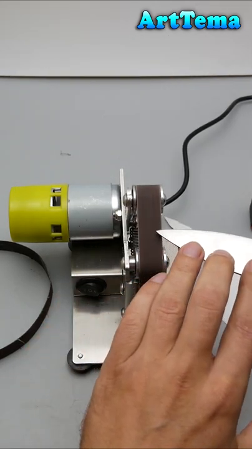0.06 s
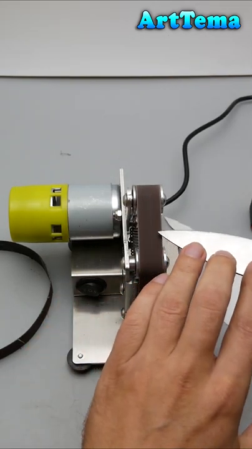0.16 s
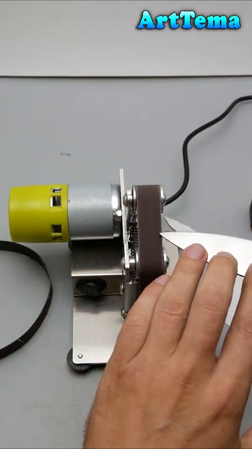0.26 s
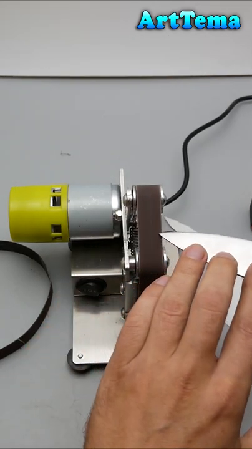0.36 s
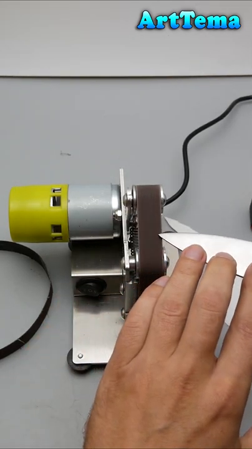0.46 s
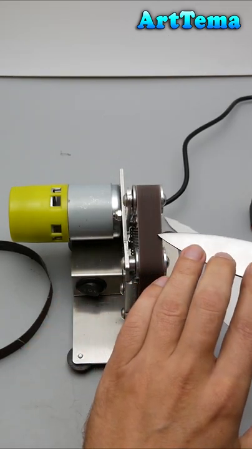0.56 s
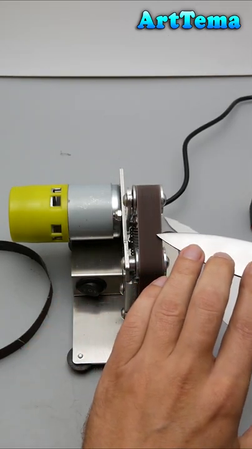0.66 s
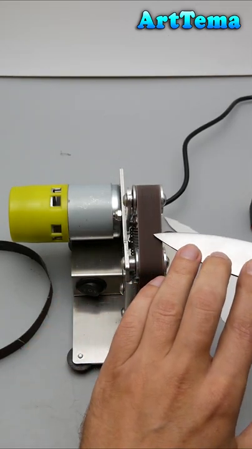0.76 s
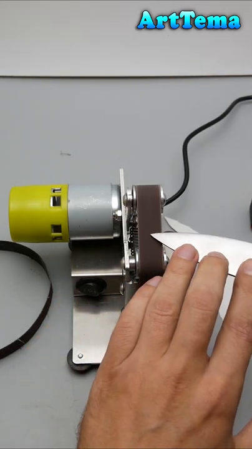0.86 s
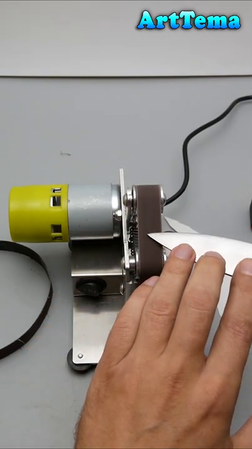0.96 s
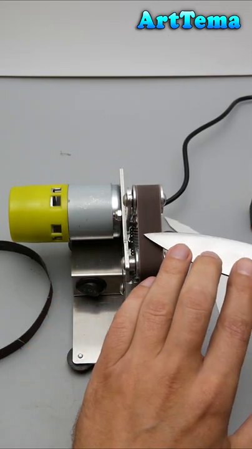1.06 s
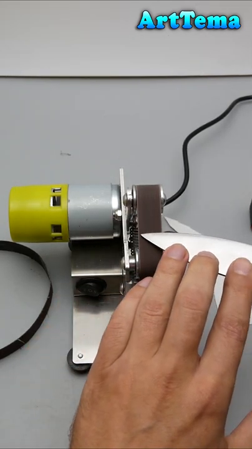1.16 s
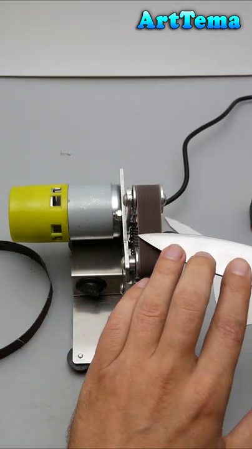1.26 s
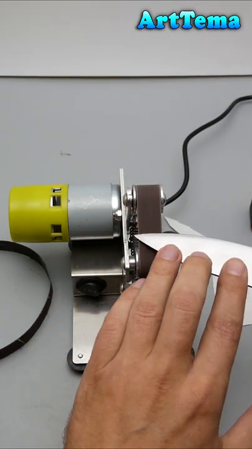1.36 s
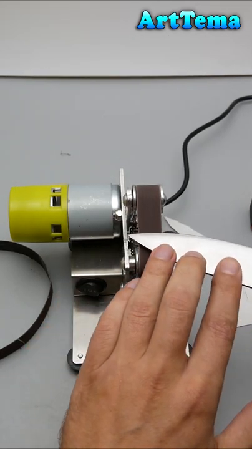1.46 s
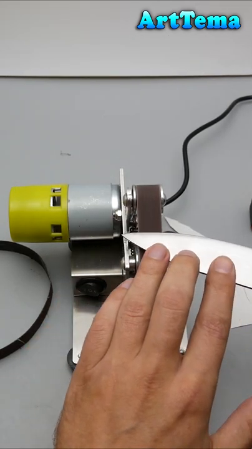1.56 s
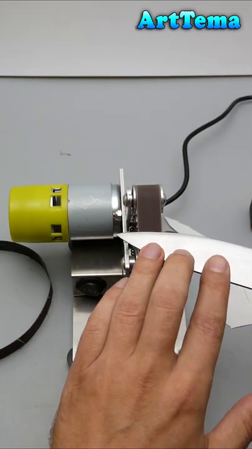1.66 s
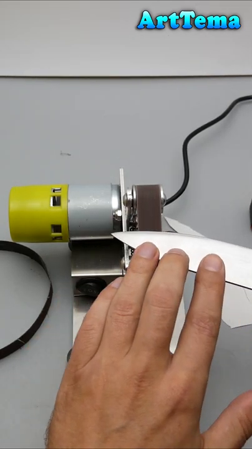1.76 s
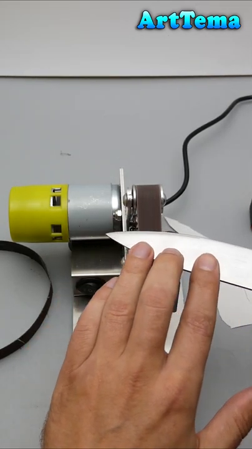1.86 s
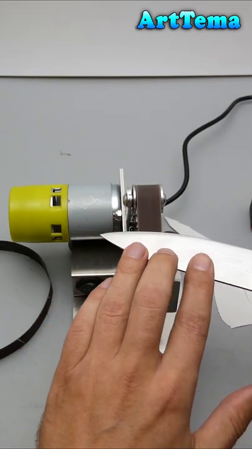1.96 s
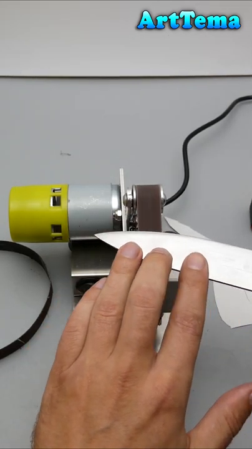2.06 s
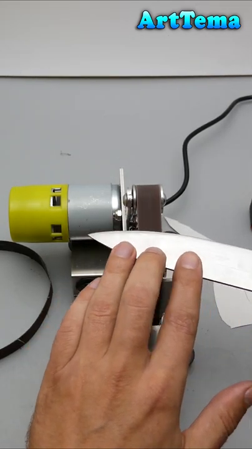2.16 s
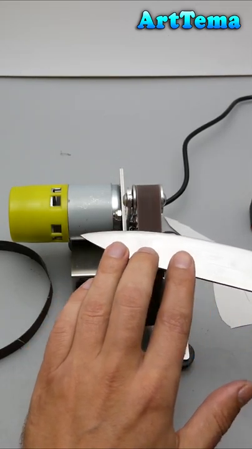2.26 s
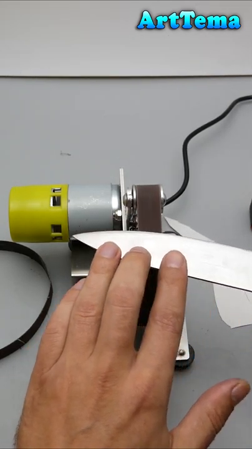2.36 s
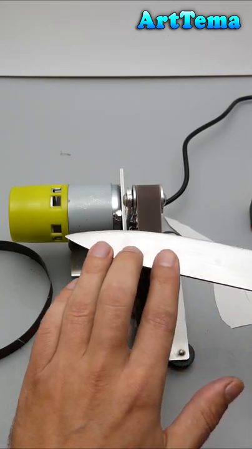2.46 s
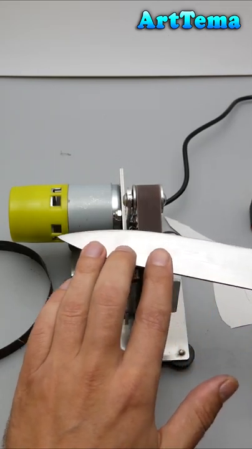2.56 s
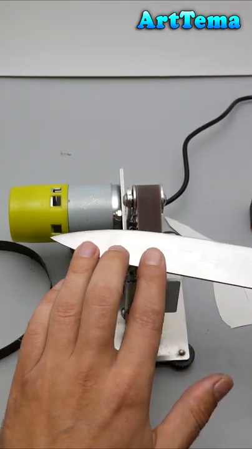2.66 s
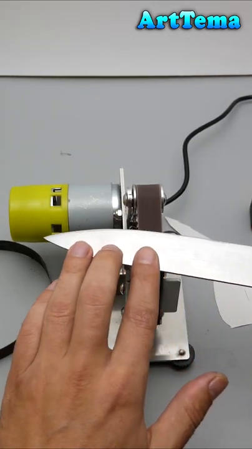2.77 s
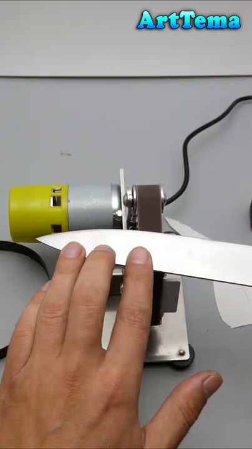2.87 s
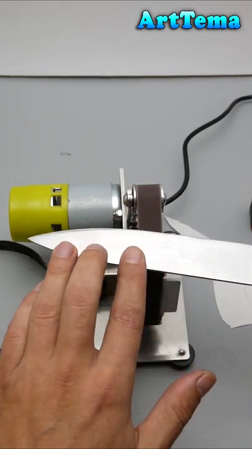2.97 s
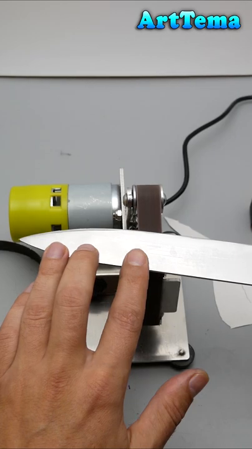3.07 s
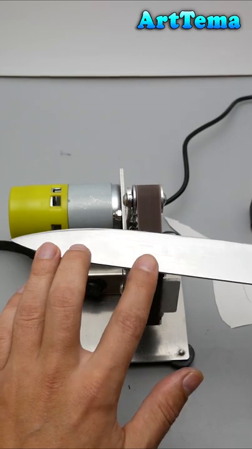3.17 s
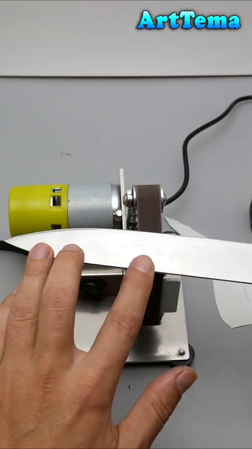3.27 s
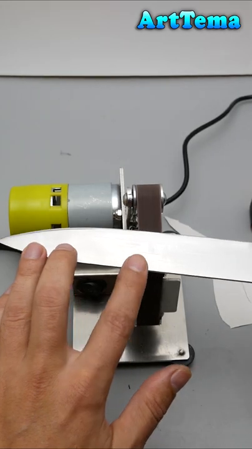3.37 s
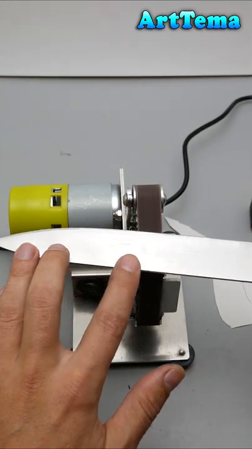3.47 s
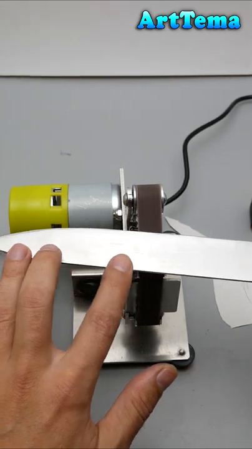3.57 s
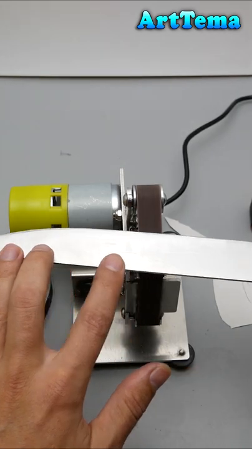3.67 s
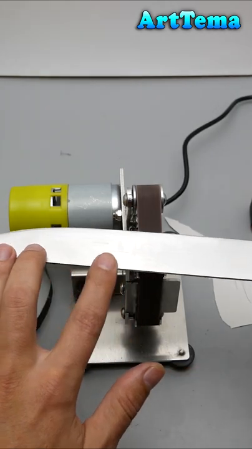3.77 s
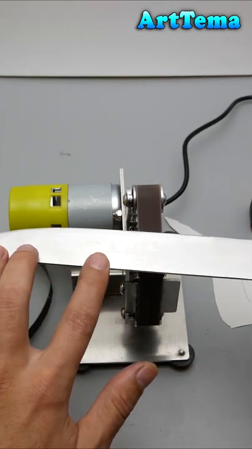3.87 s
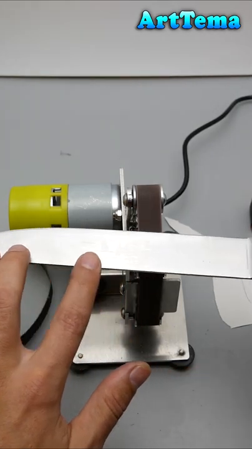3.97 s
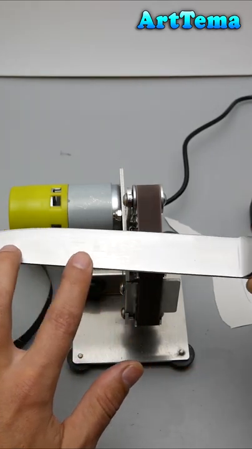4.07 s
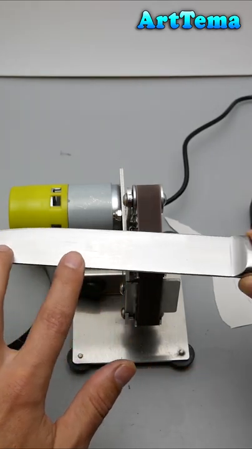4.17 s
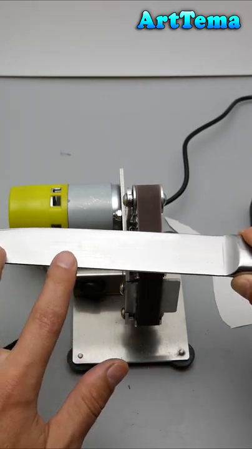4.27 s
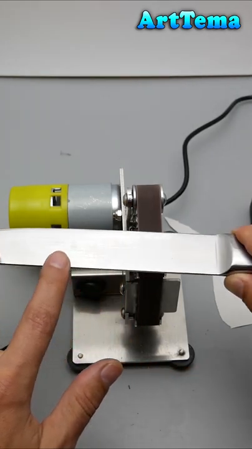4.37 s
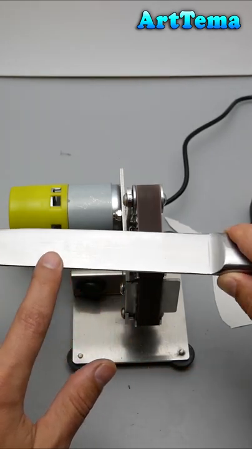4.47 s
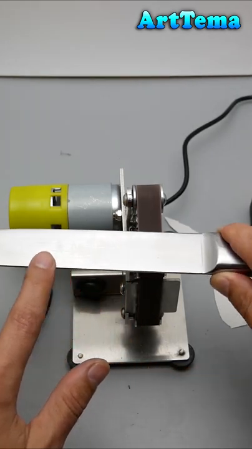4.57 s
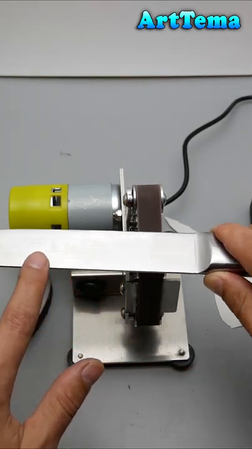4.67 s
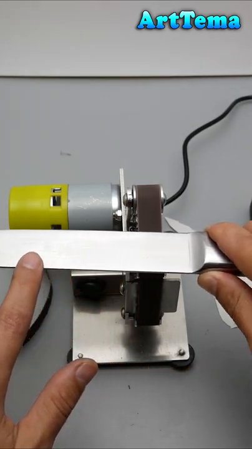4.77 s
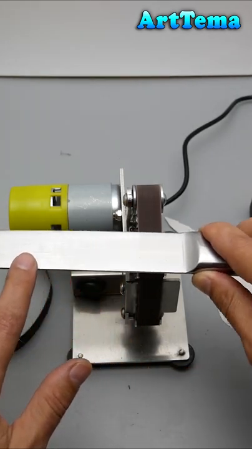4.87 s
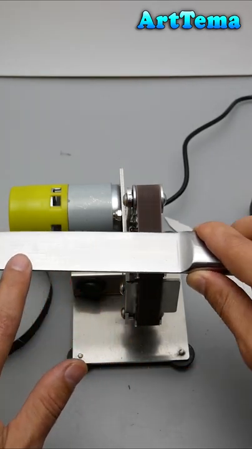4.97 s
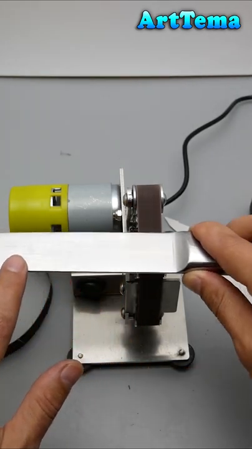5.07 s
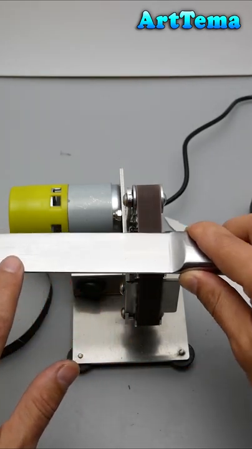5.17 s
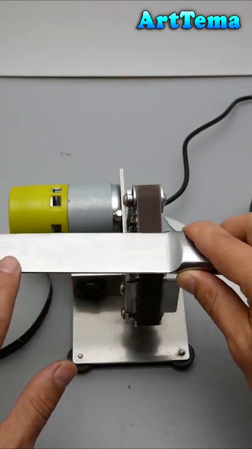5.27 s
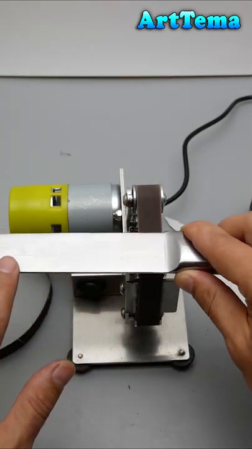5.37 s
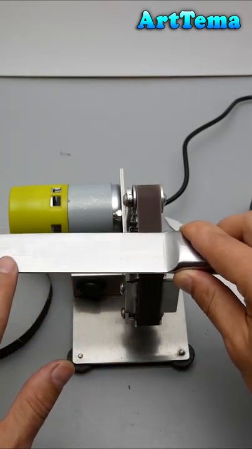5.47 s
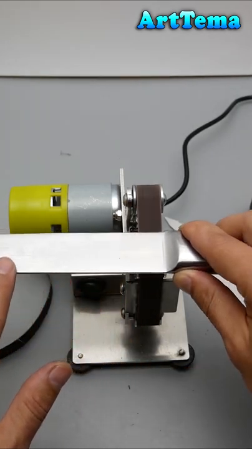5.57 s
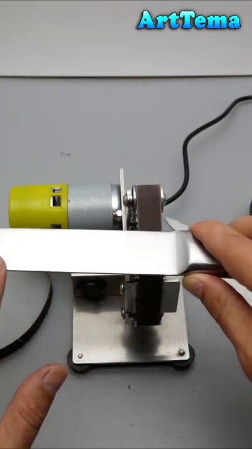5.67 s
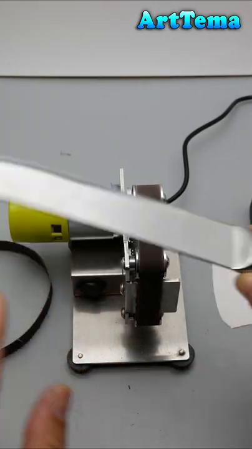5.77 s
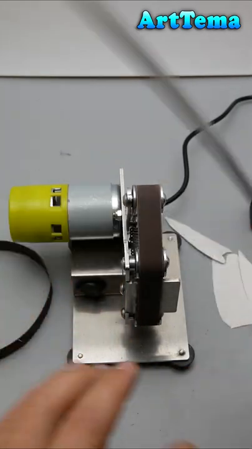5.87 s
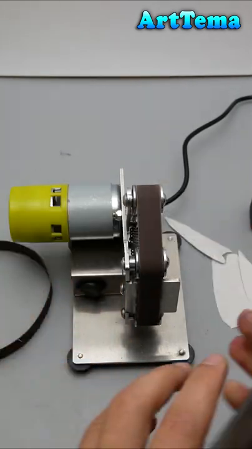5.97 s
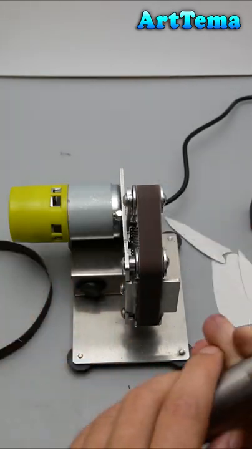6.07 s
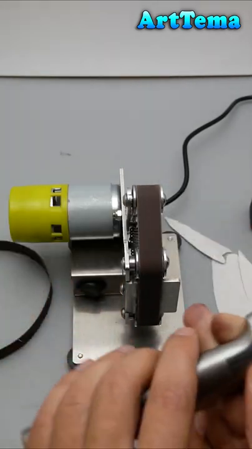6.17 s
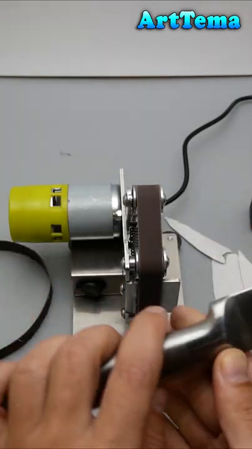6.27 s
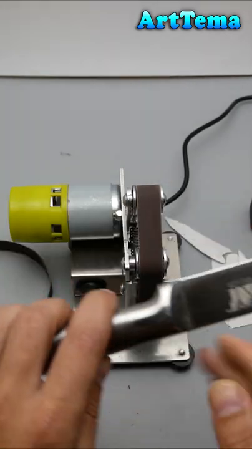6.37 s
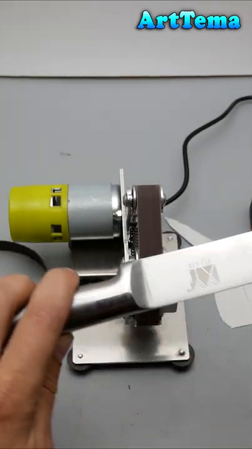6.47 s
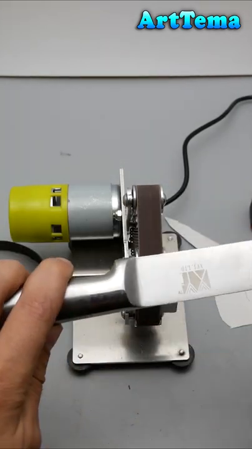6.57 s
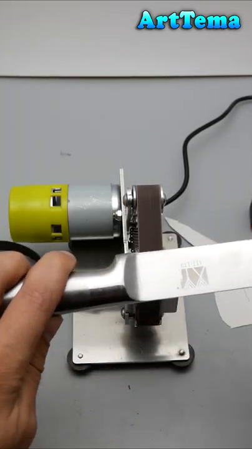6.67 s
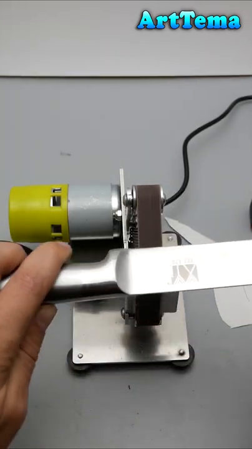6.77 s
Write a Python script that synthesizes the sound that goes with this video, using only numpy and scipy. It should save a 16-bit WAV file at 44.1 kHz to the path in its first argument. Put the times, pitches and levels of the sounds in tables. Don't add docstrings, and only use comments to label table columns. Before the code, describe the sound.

A small electric belt grinder hums and rattles, then a steel blade scrapes along its belt with gritty metallic ringing before lifting off.

```python
import sys
import numpy as np
from scipy import signal
from scipy.fft import rfft, irfft, next_fast_len
from scipy.io import wavfile
from scipy.ndimage import uniform_filter1d, map_coordinates

SR = 44100
rng = np.random.default_rng(int(sys.argv[2]) if len(sys.argv) > 2 else 0)


def persist_wave(psi):
    counts = np.round(np.clip(psi, -1, 1) * 32767).astype(np.int16)
    wavfile.write(sys.argv[1], SR, np.atleast_2d(counts).T)


def ratio_of_db(decibels):
    return 10 ** (np.asarray(decibels, float) / 20)


N = 300321
T = np.arange(N) / SR
HZ = np.maximum(np.fft.rfftfreq(next_fast_len(N + SR // 2, real=True) // 2 * 2, 1 / SR), 1)
SIZE = 2 * len(HZ) - 2
TOUCH_S, LIFT_S = .774, 5.684

# time in seconds, turns per second.
BELT_SPEED = [(0, 19.61), (.85, 19.61), (1.1, 19.46), (1.4, 19.37), (1.8, 19.32), (2.15, 19.21),
              (2.8, 19.13), (3.4, 18.95), (4.15, 18.86), (4.7, 18.91), (4.88, 18.89), (5.08, 18.71),
              (5.35, 18.77), (5.67, 18.83), (5.74, 19.62), (6, 19.645), (6.81, 19.652)]
# time in seconds, share 0-1.
LOAD = [
    (0, 0),
    (.755, 0),
    (.81, 1),
    (5.68, 1),
    (5.7, 0),
    (6.81, 0),
]
# time in seconds, gain in dB.
PHONE_GAIN = [(0, 0), (.58, 0.5), (.66, -5), (.85, -6), (1.2, -9), (2.2, -8.5), (5.1, -11.5), (5.65, -13),
              (5.76, -17), (6.1, -14.5), (6.81, -11)]

# time in seconds, level in dB.
HAND_PRESSURE = [(0.84, -40.5), (.95, -41), (1.2, -45), (1.47, -42), (1.75, -46.5), (2.15, -40),
                 (2.55, -43.5), (2.78, -40), (3.2, -45), (3.95, -46.5), (4.3, -45.5), (4.6, -45.5),
                 (5.2, -47), (5.62, -45)]
# time in seconds, level in dB, length in seconds.
GRAZES = [
    (0.62, -25.5, 0.018),
    (0.667, -28, 0.017),
]
# time in seconds, length in seconds, change in dB.
BITES = [
    (0.78, 0.0051, 9),
    (.826, 0.0051, -0.5),
    (.842, .006, -2.5),
    (0.86, .012, 0.5),
    (.896, 0.0045, -3),
    (0.91, .015, 2.5),
    (0.95, 0.0066, -2),
    (0.963, .015, 1.5),
    (1.0, .006, -1),
    (1.013, .005, 2),
]
JOINT_TICKS = [(.29, 1.6), (.69, 1.0)]
# frequency in Hz, level in dB per Hz.
GRIT_COLOUR = [(1470, -14), (2500, -10.5), (3380, -6), (4180, 5), (5030, 1.5), (8110, -4.5), (11000, -0.5),
               (13400, -7), (13900, -12), (14500, -35)]
# time in seconds, rings over grit in dB, twin ring in dB,
# main ring in dB, bending ring in dB.
HELD = [
    (.95, 5.5, -25.5, 2.5, -8),
    (1.45, 3, -1.5, -0.5, -4),
    (2.1, 2.5, -26, -0.5, -5),
    (2.8, 1, -25, 2, -4),
    (3.6, 0.5, -24, -2.5, -2.5),
    (4.4, -2, -24, 1, -3),
    (5.35, 4.5, -26, -1, -3),
]
# frequency in Hz, width in Hz, level in dB.
TIP = [(3220, 40, -9), (4130, 150, -3), (4650, 100, -3), (4860, 130, -2), (5280, 59, -11), (5670, 110, -14),
       (6860, 78, -12), (7520, 91, -9), (8250, 73, -18), (8740, 200, -13), (9510, 91, -10),
       (10900, 66, -11), (11400, 41, -14), (12100, 57, -16)]
CURVE = [(3220, 82, -8), (3610, 50, -7), (4110, 42, -2), (4660, 70, -5), (4880, 80, -6), (5940, 200, -9),
         (6490, 26, -10), (6850, 39, -13), (7590, 140, -7), (8230, 44, -13), (8680, 72, -9),
         (9530, 170, -8), (10300, 87, -13)]
BELLY = [(3430, 110, -8), (4320, 56, 0), (4720, 60, -12), (5920, 47, -7), (6360, 38, -8), (6590, 40, -8),
         (7110, 43, -11), (7410, 120, -10), (8210, 86, -16), (8700, 100, -11), (9620, 270, -10),
         (10300, 150, -9), (11900, 51, -18)]
FRONT = [(3630, 130, -9), (4110, 80, -6), (4710, 50, -12), (5750, 81, -8), (6500, 110, -9), (7390, 40, -6),
         (8240, 96, -15), (8700, 130, -10), (9810, 110, -10), (10300, 88, -11), (10800, 97, -11),
         (11200, 35, -13), (11600, 36, -11)]
MIDDLE = [(3610, 63, -4), (4220, 67, 0), (4730, 57, 0), (5880, 85, -6), (6590, 160, -7), (7340, 110, -5),
          (7630, 58, -3), (8070, 38, -8), (8690, 92, -4), (9750, 140, -7), (10600, 37, -5), (10800, 38, -6),
          (11600, 55, -9)]
REAR = [(4220, 56, -1), (4710, 68, 0), (5280, 38, -8), (5630, 33, -6), (5870, 51, -6), (6600, 130, -6),
        (6790, 49, -7), (7590, 100, -2), (8070, 57, -10), (8730, 210, -5), (9800, 95, -10), (10500, 46, -8),
        (11200, 100, -3)]
HEEL = [(3570, 31, -11), (4070, 90, -6), (4300, 35, -8), (4720, 74, -7), (5660, 100, -9), (6480, 36, -12),
        (6950, 49, -11), (7380, 44, -11), (7580, 76, -12), (8700, 54, -6), (9220, 110, -12),
        (9960, 70, -11)]
# frequency in Hz, width in Hz, level in dB.
THIN_EDGE = [(12150, 43, -22), (12700, 53, -21), (13050, 36, -21), (13350, 37, -23), (13650, 45, -20)]
# frequency in Hz, width in Hz.
TWINS = [(4110, 60), (4290, 80), (4750, 70), (4860, 60)]
# frequency in Hz, width in Hz, level in dB.
BENDING = [(1735, 44, 0), (1400, 60, -12), (1880, 34, -5), (1035, 40, -13)]
# time in seconds, share 0-1.
BEND_LOCK = [(0, .3), (1.9, .25), (2.25, 1), (3.15, 1), (3.5, .65), (4.7, .6), (5, .4)]
BEND_ORDERS = [89, 91, 92, 98]
BEND_SHARES = [.35, 1, .2, .6]
# start and end in seconds, frequency in Hz, level in dB, waver in Hz.
SQUEALS = [
    (1.25, 1.8, 11420, -43.5, 60),
    (5.08, 5.62, 11040, -43, 75),
    (4.06, 4.36, 11170, -47, 30),
]
# start and end in seconds, frequency in Hz, level in dB, waver in Hz.
WHISTLES = [
    (2.0, 2.3, 4315, -46, 20),
    (2.24, 2.82, 4712, -43, 8),
    (2.66, 2.94, 4170, -40, 115),
    (3.7, 4.45, 4720, -50, 10),
    (3.85, 4.15, 4210, -47, 60),
    (5.34, 5.68, 4092, -43.5, 25),
    (4.88, 5.68, 5665, -54, 5),
]

# multiple of the belt turn, level in dB running free, under tip, front and rear.
HUM = [(6, -63, -66, -62, -70), (7, -57, -58, -58, -55), (14, -65, -68, -63, -66), (15, -45, -50, -45, -55),
       (16, -48, -51, -47, -43), (17, -52, -54, -56, -61), (18, -43, -47, -57, -57),
       (19, -42, -45, -47, -48), (20, -56, -59, -59, -58), (22, -53, -59, -60, -67),
       (23, -47, -53, -56, -54), (25, -46, -53, -59, -60), (26, -50, -59, -57, -60),
       (27, -47, -67, -65, -64), (28, -44, -66, -66, -71), (29, -38, -57, -55, -58),
       (30, -53, -62, -61, -66), (31, -55, -66, -65, -70), (32, -55, -62, -46, -54),
       (33, -47, -56, -52, -54), (36, -53, -58, -62, -60), (37, -51, -61, -58, -60),
       (38, -59, -54, -49, -58), (39, -72, -56, -59, -58), (40, -57, -61, -55, -56),
       (51, -52, -53, -59, -62), (53, -63, -62, -61, -54), (54, -52, -53, -45, -52),
       (56, -52, -55, -56, -52), (57, -45, -47, -58, -58), (58, -53, -55, -54, -62),
       (61, -64, -63, -63, -64)]
HUM_S = [1.05, 2.55, 4]
# turns per belt turn, level in dB free, under tip, front, rear.
WHEELS = [(4.061, -56, -60, -60, -60), (16.239, -52, -61, -46, -55), (32.49, -57, -70, -70, -70),
          (5.415, -62, -68, -68, -68), (15.225, -64, -72, -54, -66), (65, -50, -60, -51, -54),
          (72, -52, -54, -56, -60), (97, -48, -58, -60, -70), (73, -57, -52, -58, -50),
          (62, -56, -58, -52, -53), (71, -51, -52, -53, -51), (74, -68, -64, -52, -52)]
WHEEL_S = [1.15, 2.9, 4.2]
# time in seconds, frequency in Hz, level in dB.
CLAMP = [
    (.74, 580, -75),
    (.8, 635, -53),
    (.88, 700, -57),
    (.96, 742, -55),
    (1.04, 745, -56),
    (1.14, 745, -72),
]
# frequency in Hz, level in dB.
PLATES = [
    (2383, -46),
    (3652, -51),
]
# frequency in Hz, level in dB per Hz.
FREE_RATTLE = [(29, -54), (50, -9), (129, 0), (208, -5.5), (289, 10.5), (413, 5), (562, 3), (862, -13.5),
               (1120, -13.5), (1710, -10.5), (3400, -9.5), (7600, -19), (10200, -17.5), (13700, -31),
               (14300, -81)]
PRESSED_RATTLE = [(29, -56), (50, -43), (129, -9), (209, -15), (294, 18.5), (503, 7.5), (745, -5.5),
                  (815, -6.5), (1030, -3.5), (1580, -5), (1700, -7.5), (2140, -4.5), (3600, -7.5),
                  (4680, -0.5), (7920, -120)]
# frequency in Hz, width in Hz, level in dB.
FRAME = [(1110, 46, 0), (1390, 32, -2), (1740, 93, -1), (1920, 79, 0), (2380, 40, -4), (3190, 56, -3),
         (3650, 45, 0), (4050, 43, -6), (4710, 140, -6), (5870, 45, -6), (6390, 71, -10), (7470, 46, -13),
         (9180, 99, -13), (10000, 150, -10)]
# frequency in Hz, share 0-1.
REPEATS = [(100, 0.13), (500, 0.35), (1000, 0.89), (3000, 0.87), (5000, 1), (8000, 0)]
QUIET_ORDERS = [48, 49, 52, 55]
KNOCK_ORDER = 90

# frequency in Hz, level in dB or phase in rad.
PORT_DB = [(60, 4.0), (110, 4.5), (200, 4.0), (370, 5.0), (690, 2.5), (1260, -1.5), (2320, -2.0),
           (4260, -0.5), (7830, -0.3), (14400, -0.5)]
PORT_RAD = [(0, 0), (430, -0.5), (950, -0.6), (1290, -0.2), (1550, -0.6), (1890, 0.0), (2580, -0.0),
            (3100, 0.2), (4740, 0.0), (14600, -0.0)]
# frequency in Hz, share of power.
ROOM_SHARE = [(100, 0.015), (500, 0.012), (1000, 0.035), (2500, 0.12), (5000, 0.025), (9000, 0.035),
              (13000, 0.06)]


def level(x, db):
    return x * ratio_of_db(db) / np.sqrt(np.mean(x ** 2))


def over_hz(table):
    hz, value = np.transpose(table)
    return np.interp(np.log(HZ), np.log(np.maximum(hz, 1)), value)


def over_s(table):
    s, *columns = np.transpose(table)
    return [np.interp(T, s, c) for c in columns]


def shape(x, response):
    return irfft(rfft(x, SIZE) * response, SIZE)[:N]


def band(x, low_hz, top_hz):
    return shape(x, 1 / (1 + (low_hz / HZ) ** 16) / (1 + (HZ / top_hz) ** 16))


def rings(modes):
    return np.sqrt(sum(ratio_of_db(2 * db) / (1 + (2 * (HZ - hz) / width) ** 2) ** 1.3 for hz, width, db in modes))


def flicker(rate):
    k = int(SR / rate)
    steps = np.repeat(rng.standard_normal(N // k + 1), k)
    return level(uniform_filter1d(steps, k)[:N], 0)


def surface(turn, memory_turns, even=0, skip=(), size=4096):
    keep = np.exp(-1 / max(memory_turns, .1))
    fresh = rng.standard_normal((int(turn[-1]) + 2, size))
    fresh[1:] *= np.sqrt(1 - keep ** 2)
    orders = rfft(signal.lfilter([1], [1, -keep], fresh, axis=0))
    orders[:, list(skip)] = 1e-9
    worn = irfft(orders / np.abs(orders) ** even, size).ravel()
    return map_coordinates(worn, [turn * size], order=1)


def blade(turn):
    since = np.maximum(T - TOUCH_S, 0)
    ring_db, bend_db = over_s(HELD)[2:]
    grit = belt_grit(turn)
    steel = steel_rings(grit)
    main = band(steel, 3900, 5000)
    edge = band(steel, 7500, 20000)
    rest = (steel - main - edge) / np.std(band(steel, 5000, 7500))

    hump = np.cos(2 * np.pi * (turn - .12)) + 0.69 * np.cos(4 * np.pi * (turn - .22))
    throb = 0.053 + 0.23 * np.exp(-since / 0.043) + 0.0035 * since
    swing = np.clip(1 + throb * hump, .05, 3)
    bright_db = (1 - 0.26) * (-40.5 - over_s(HAND_PRESSURE)[0]) + 3 * np.exp(-since / 0.25)
    edge = level(edge, 0) * ratio_of_db(bright_db) * swing ** 1.7
    bend = bending(turn, grit) * ratio_of_db(bend_db)
    return hand_press() * ((rest + level(main, 0) * ratio_of_db(ring_db) + edge) * swing + bend)


def hand_press():
    contact = np.interp(T, [TOUCH_S, TOUCH_S + .009, LIFT_S - .006, LIFT_S + .008], [0, 1, 1, 0])
    press = ratio_of_db(over_s(HAND_PRESSURE)[0]) * contact
    for s, db, length in GRAZES:
        onset = np.clip((T - s) / 0.0066, 0, 1)
        press = press + ratio_of_db(db - 13.5) * onset * np.exp(-((T - s) / length) ** 2)
    return press * ratio_of_db(sum(db * np.exp(-((T - s) / length) ** 2) for s, length, db in BITES))


def belt_grit(turn):
    lumps = ratio_of_db(0.14 * level(uniform_filter1d(surface(turn, 38), 200), 0))
    pattern = level(surface(turn + .00005 * flicker(30), 36, .12), 0)
    grit = (pattern + .17 * rng.standard_normal(N)) * lumps
    ticks = sum(size * np.exp(-((turn % 1 - place) / .03) ** 2) for place, size in JOINT_TICKS)
    return grit + band(grit * ticks * np.clip((T - .9) / 0.65, .25, 1), 3540, 4200)


def steel_rings(grit):
    steel, broad = 0, ratio_of_db(over_hz(GRIT_COLOUR) - 7.5 - 6.5)
    held_s, held_db, twin_db = np.transpose(HELD)[:3]
    for k, modes in enumerate([TIP, CURVE, BELLY, FRONT, MIDDLE, REAR, HEEL]):
        here = np.sqrt(np.interp(T, held_s, np.arange(len(HELD)) == k))
        twins = [(hz, width, twin_db[k]) for hz, width in TWINS]
        ring = rings(modes + THIN_EDGE + twins)
        steel = steel + here * shape(grit, np.hypot(broad, ratio_of_db(held_db[k]) * ring))
    return shape(steel, 1 - 0.67 / (1 + ((HZ - 5070) / 130) ** 2))


def bending(turn, grit):
    pattern = level(surface(turn, 68, 0.17, skip=BEND_ORDERS), 0)
    locked = sum(share * np.cos(2 * np.pi * k * turn) for k, share in zip(BEND_ORDERS, BEND_SHARES))
    drive = pattern + 0.2 * grit + 0.11 * over_s(BEND_LOCK)[0] * locked
    return level(shape(drive, rings(BENDING)), 0)


def squeal(turn):
    burst = 0.74 + np.exp(1.3 * (np.cos(2 * np.pi * (turn - .18)) - 1))
    glide_hz = 444 * np.clip(1 + (T - LIFT_S) / 0.04, 0, 1)
    return burst * sing(SQUEALS, turn - .72, lambda: 0.8 + 0.47 * (flicker(180) + 1j * flicker(220)), glide_hz)


def whistle(turn):
    return sing(WHISTLES, turn - .25, lambda: 1 + .2 * (flicker(90) + 1j * flicker(81)), lean=.6)


def sing(events, top_turn, rough, glide_hz=0, lean=0):
    out = 0
    for start, end, hz, db, waver_hz in events:
        db = db - 52 * np.maximum(start - T, 0) - 52 * np.maximum(T - end, 0)
        beat = 2 * top_turn + .24 if 4500 < hz < 5000 else top_turn - .17
        hz = hz + waver_hz * np.cos(2 * np.pi * top_turn) + glide_hz
        throb = 1 + lean * min(.5 + waver_hz / 100, 1) * np.cos(2 * np.pi * beat)
        out = out + ratio_of_db(db) * throb * np.real(rough() * np.exp(2j * np.pi * np.cumsum(hz) / SR))
    return out * np.interp(T, [LIFT_S - .004, LIFT_S + .008], [1, 0])


def grazes():
    swell = sum(ratio_of_db(db - 6) * np.exp(-((T - s - .005) / (.6 * length)) ** 2) for s, db, length in GRAZES)
    return swell * np.cos(2 * np.pi * 4110 * T)


def hum(turn, load):
    out = 0
    for (order, free_db, *pressed_db), chance in zip(HUM, rng.standard_normal((len(HUM), 2))):
        sag_db = -2 * (T > LIFT_S) * np.exp(-((order - 28.5) / 2.5) ** 2)
        free = ratio_of_db(free_db + sag_db) * np.cos(2 * np.pi * round(order) * (turn - .34) + 1.0 * chance[0])
        heel_damp_db = 6 * (round(order) == 16) * np.clip((T - 5) / .1, 0, 1)
        held = ratio_of_db(np.interp(T, HUM_S, pressed_db) + 1.8 * flicker(2.516) - heel_damp_db)
        pressed = held * np.cos(2 * np.pi * round(order) * (turn - .14) + 1.3 * chance[1])
        out = out + (1 - load) * free + load * pressed
    for ratio, free_db, *pressed_db in WHEELS:
        db = free_db + load * (np.interp(T, WHEEL_S, pressed_db) - free_db)
        out = out + ratio_of_db(db) * np.cos(2 * np.pi * (ratio * turn + 1.09))
    return np.sqrt(2) * out


def clamp():
    hz, db = over_s(CLAMP)
    return ratio_of_db(db) * np.sqrt(2) * (1 + 0.25 * flicker(45)) * np.cos(2 * np.pi * np.cumsum(hz) / SR)


def knock(turn, load):
    free = .55 + (1 - .55) * np.clip((T - LIFT_S) / .4, 0, 1)
    lag = np.exp(-2j * np.pi * (turn - .62))
    rough = 1 + 0.3 * (flicker(160) + 1j * flicker(130))
    strike = 1 + 0.99 * lag + .5 * lag ** 3 + 0.35 / lag ** 4
    out = ratio_of_db(-41) * free * np.real(rough * strike * np.exp(2j * np.pi * KNOCK_ORDER * turn))
    wake = np.clip(np.abs(T - LIFT_S) / .8, 0, 1)
    for hz, db in PLATES:
        rough = 1 + .5 * (flicker(30) + 1j * flicker(25))
        out = out + ratio_of_db(db) * wake * np.real(rough * np.exp(2j * np.pi * hz * T))
    return (1 - load) * out


def rattle(turn, load):
    share = np.clip(over_hz(REPEATS), 0, 1)
    lines = [round(row[0]) for row in HUM] + [row[0] for row in WHEELS[5:]] + QUIET_ORDERS
    lines = lines + [KNOCK_ORDER + k for k in (-1, 0, 1)]
    hiss = rng.standard_normal(N)
    clear = np.clip((HZ - 500) / 500, .09, 1)

    def shake(memory_turns, body):
        pattern = level(surface(turn, memory_turns, skip=lines), 0)
        return shape(pattern, np.sqrt(share) * clear * body) + shape(hiss, np.sqrt(1 - share) * clear * body)

    free = shake(240, ratio_of_db(over_hz(FREE_RATTLE)) * (1 + .8 * rings(FRAME)))
    pressed = shake(12.2, ratio_of_db(over_hz(PRESSED_RATTLE)))
    return (1 - load) * level(free, -30) + load * level(pressed, -34.0)


def ports(near):
    port = ratio_of_db(over_hz(PORT_DB) / 2) * np.exp(.5j * over_hz(PORT_RAD))
    fade = np.exp(-np.log(1000) * T / .15)
    tail = level(rng.standard_normal(N) * fade, 0) / np.sqrt(N)
    room = rfft(tail, SIZE) * np.sqrt(np.clip(over_hz(ROOM_SHARE), 0, 1))
    return np.array([shape(near, port * (1 + room)), shape(near, (1 - room) / port)])


def port_rumble():
    rumble = np.array([level(band(rng.standard_normal(N), 20, 390), -61) for _ in range(2)])
    return rumble * ratio_of_db(over_s(PHONE_GAIN)[0] - 4 * over_s(LOAD)[0])


def scene():
    turn = np.cumsum(over_s(BELT_SPEED)[0]) / SR
    load, gain = over_s(LOAD)[0], ratio_of_db(over_s(PHONE_GAIN)[0])
    knife = blade(turn) + squeal(turn) + whistle(turn) + grazes()
    grinder = gain * (hum(turn, load) + knock(turn, load) + rattle(turn, load)) + clamp()
    return ports(knife + grinder)


def roll_off(x):
    return signal.sosfilt(signal.butter(12, 14450, fs=SR, output="sos"), x)


def record(dry):
    notch = 1 - .65 / (1 + ((HZ - 7900) / 70) ** 2)
    mic = notch / np.sqrt(1 + (45 / HZ) ** 4) / np.sqrt(1 + (HZ / 12300) ** 16)
    mix = np.array([shape(x, mic) for x in dry + port_rumble()])
    return roll_off(mix)


dry = scene()
out = record(dry)
persist_wave(out)
```